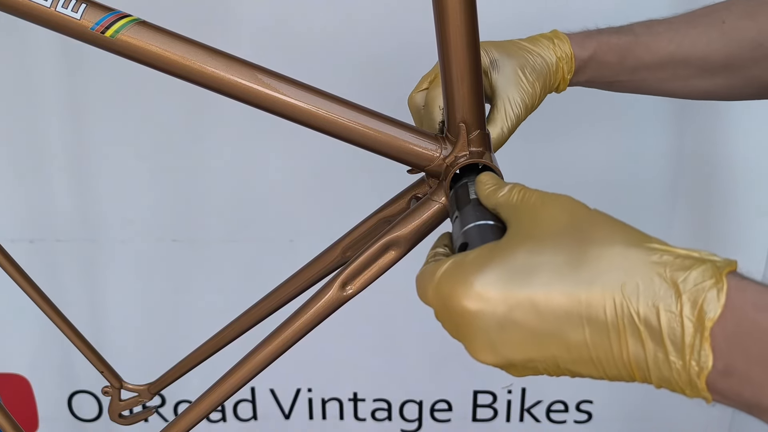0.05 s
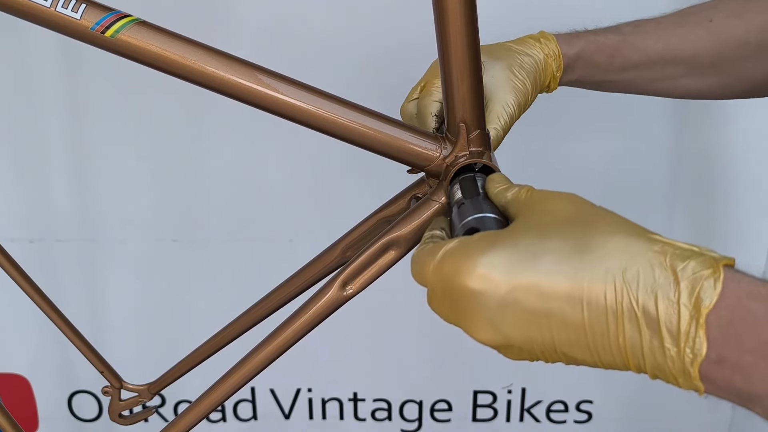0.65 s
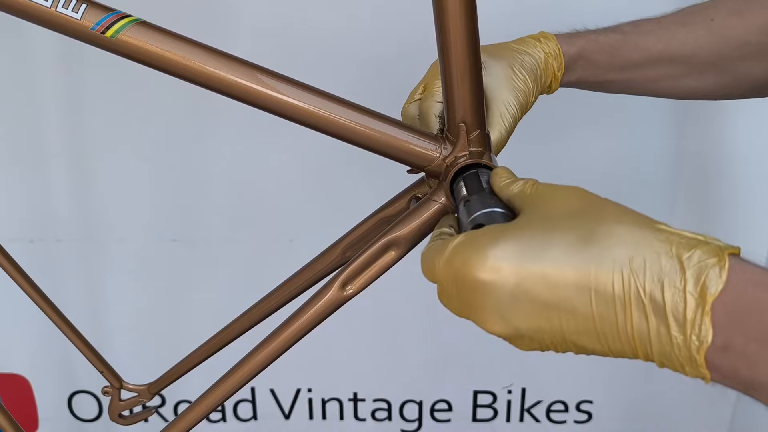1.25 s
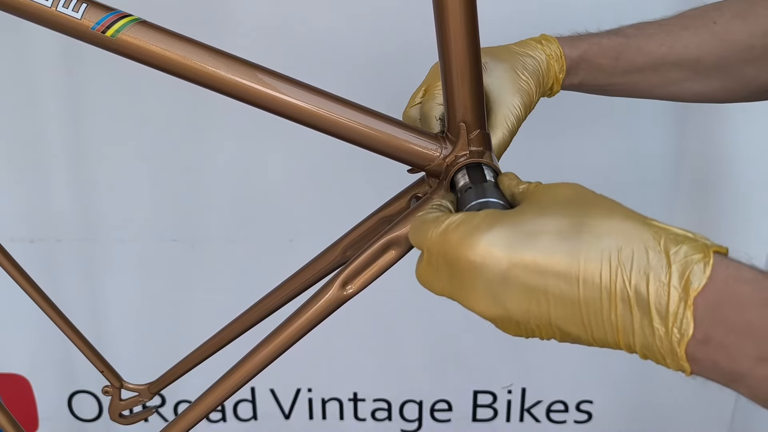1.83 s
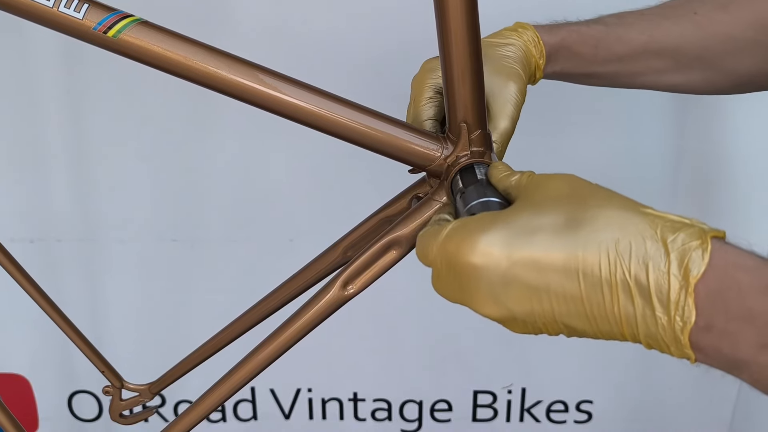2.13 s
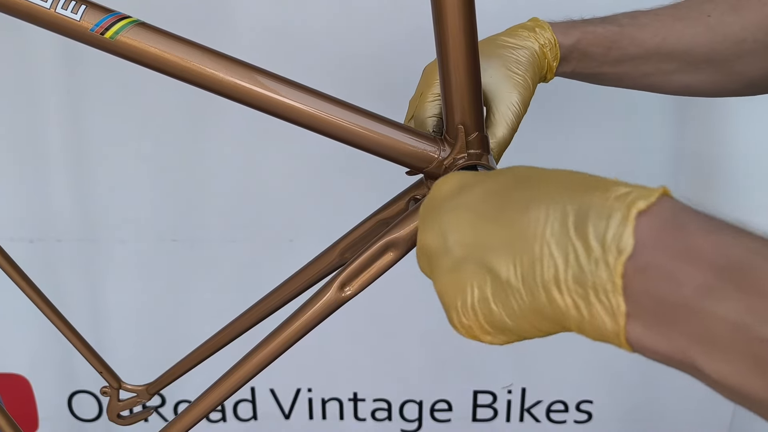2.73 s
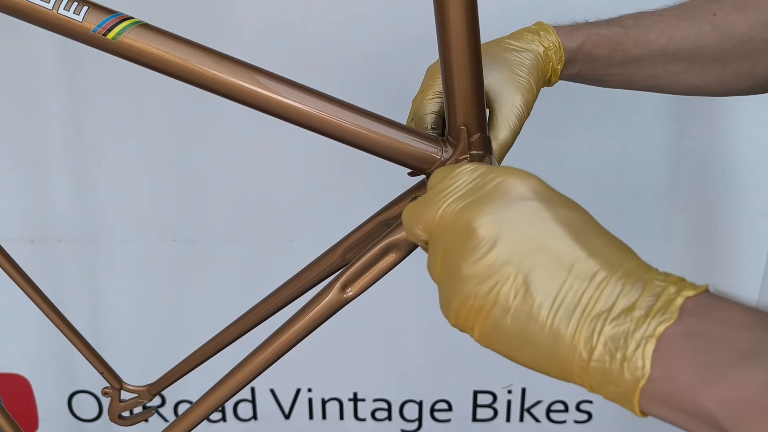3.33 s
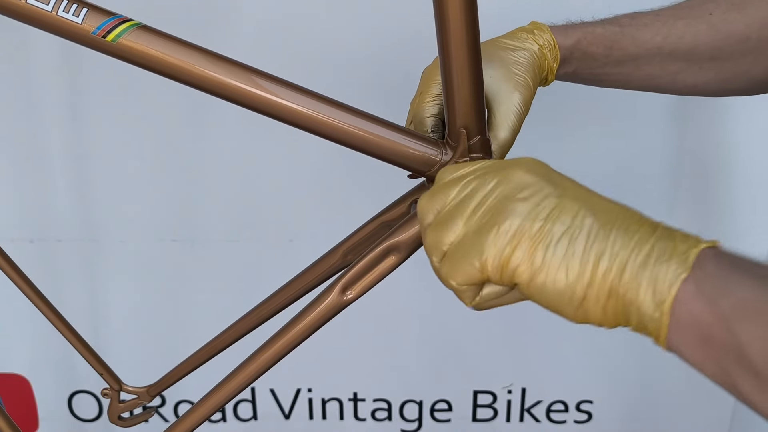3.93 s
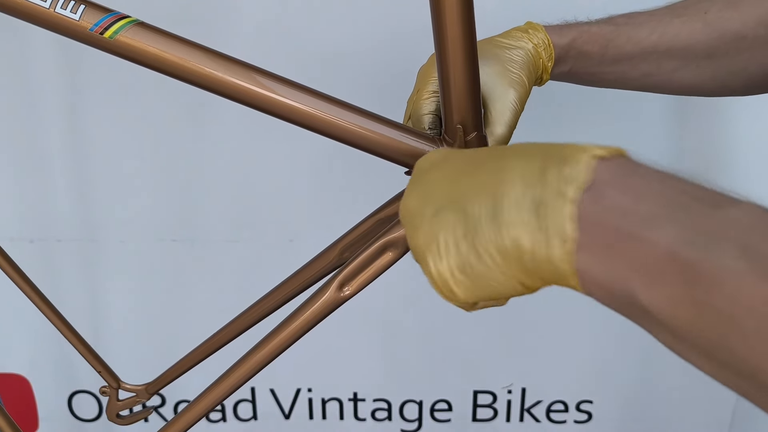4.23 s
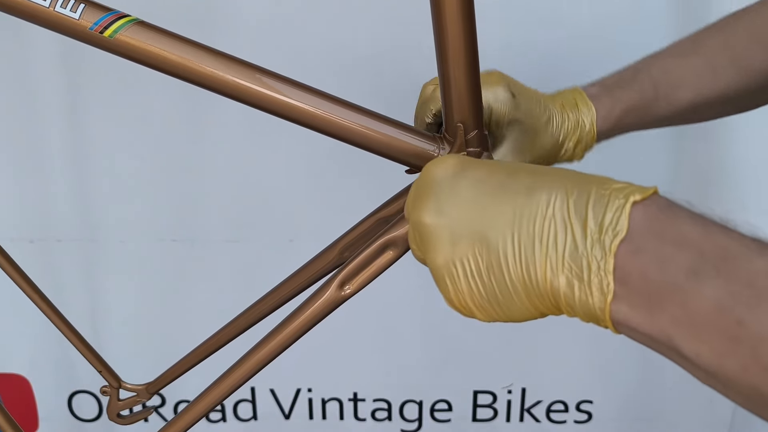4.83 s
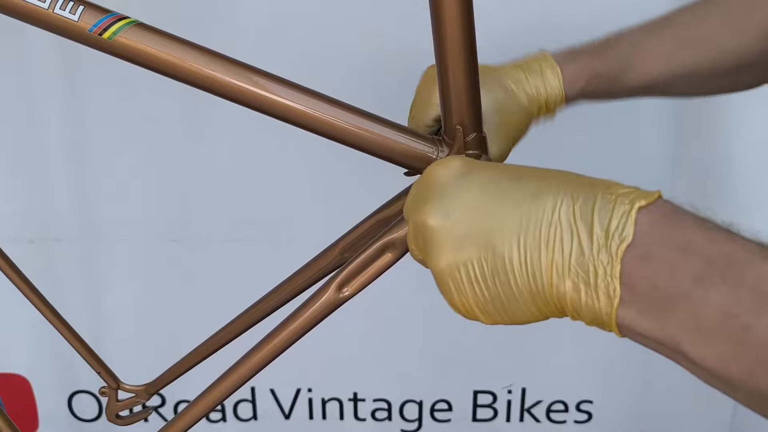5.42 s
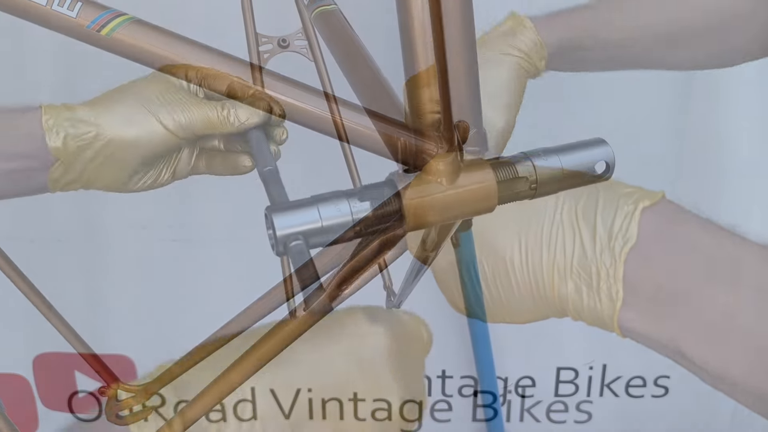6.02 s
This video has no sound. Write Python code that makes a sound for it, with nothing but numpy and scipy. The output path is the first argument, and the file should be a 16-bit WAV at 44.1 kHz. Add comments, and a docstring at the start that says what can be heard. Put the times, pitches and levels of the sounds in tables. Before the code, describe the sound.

A short rub of rubber gloves and a scrape lead into one ringing knock as a metal tool seats in a steel bicycle frame. Lighter clinks and faint scrapes follow while it is turned by hand. Later the gloves rub, crinkle and give tiny snaps, with a few more metal clicks among them. A spaced pair of microphones hears it from a little way back in a quiet workshop.

```python
"""A short rub of gloves, then a scrape into a ringing knock: a metal tool seats in the bottom bracket
of a steel bicycle frame and is turned by hand. Each knock sets the frame tubes ringing; in between,
the tool slides on the metal and the rubber gloves rub, crinkle and snap.
A spaced pair of microphones hears it in a quiet workshop, far enough back to take in plenty of room."""
import sys
import numpy as np
from scipy import signal
from scipy.fft import rfft, irfft, next_fast_len
from scipy.io import wavfile

SR = 44100
rng = np.random.default_rng(int(sys.argv[2]) if len(sys.argv) > 2 else 0)


def generate_wav(sig):
    """Save sig (samples, or channels by samples) to the path in sys.argv[1] as 16-bit PCM at SR."""
    pcm = np.round(np.clip(np.atleast_2d(sig).T, -1, 1) * 32767).astype(np.int16)
    wavfile.write(sys.argv[1], SR, pcm)


N = 272097
TIME = np.arange(N) / SR
AGE = np.arange(SR) / SR   # one second, counted from an onset
BLOW_GAIN = np.sqrt(SR / 100)   # gives a unit-energy blow the energy of 10 ms at unit power


# Modes of the frame's thump, the hollow bracket shell, the tool's clank and the long-ringing tubes.
# Each row: pitch in Hz, relative level in dB, time to fall 60 dB in seconds.
THUMP_MODES = [(121, -15, 0.081), (181, 1.5, 0.027), (243, -2.5, 0.06), (329.4, 0.5, 0.078),
               (382, -6, 0.093), (470, 2, 0.053)]
SHELL_MODES = [(773, 6, 0.026), (828, -3, 0.044), (876, -1, 0.11), (982, 1, 0.046)]
CLANK_MODES = [(1050, 2, 0.015), (1316, -3.5, 0.014), (1343, -2, 0.017), (1462, 0, 0.021),
               (1756, -6, 0.021), (2065, -5.5, 0.026)]
TUBE_MODES = [(242, -18, .35), (386, -12, .33), (490, -14, .65), (583, -17, .7), (803, -7, .25),
              (863, -6, .33), (942, -5, .33), (1104, -6, .44), (1246, -4, .25), (1372, -3, .3),
              (1512, -3, .32), (1658, -17, .4), (1696, -10, .22), (1762, -6, .25), (1948, -5, .28),
              (2094, -8, .3), (2342, -12, .2), (2401, -6, .28), (2470, -10, .25), (2988, -16, .3),
              (3499, -18, .28), (3671, -22, .27), (3895, -16, .22), (4840, -29, .26)]
# Tool meets frame. Each row: start in seconds, then relative dB of thump, shell, clank and clack.
KNOCKS = [(0.4015, -34, -25.5, -20.5, -34.5), (0.421, -58, -42, -40, -42), (0.4534, -54, -35.5, -51, -63),
          (0.463, -64, -42, -50, -59), (0.5772, -49, -42.5, -44.5, -72), (1.069, -62.5, -61, -61.5, -68),
          (1.212, -72, -59, -75, -72), (1.281, -66, -56.5, -66, -73), (1.610, -54.5, -46.5, -49.5, -59.5),
          (2.0232, -58, -46, -48, -53.5), (2.032, -58, -47.5, -69, -70), (2.517, -64, -81, -81, -69.5),
          (3.165, -74, -68, -67, -75), (3.387, -63, -73, -84, -75), (4.015, -59.5, -66, -67, -61.5),
          (4.470, -57, -66, -63, -68), (4.528, -45.5, -48.5, -47, -60), (4.758, -60, -52.5, -51, -41),
          (4.772, -65, -58.5, -51, -50.5)]

def knocks(room, tubes_db=-4, left_db=-0.3):
    """Each contact thumps the frame, sounds its shell and clanks the tool; the tubes ring on."""
    thump = struck(THUMP_MODES, lag_ms=0.12, spread_ms=0.044, contact_s=0.0024)
    shell = struck(SHELL_MODES, lag_ms=0.31, spread_ms=0.12, contact_s=0.00012)
    clank = struck(CLANK_MODES, lag_ms=0.25, spread_ms=0.0315, contact_s=0.0016)
    tubes = struck(TUBE_MODES, lag_ms=0.15, spread_ms=0.13, contact_s=0.0027)
    parts = np.array([with_room(thump, room, wet_db=-0.5),
                      with_room(shell, room, wet_db=-7),
                      with_room(clank, room, wet_db=-3.5) + from_db(tubes_db) * tubes,
                      with_room(clack(), room, wet_db=3)])
    out = np.zeros((2, N))
    for start, *levels_db in KNOCKS:
        add(out, start, BLOW_GAIN * np.tensordot(from_db(levels_db), parts, 1))
    return out * from_db([[left_db], [-left_db]])


def struck(modes, lag_ms, spread_ms, contact_s):
    """Modes swell on contact and ring, each from its own place, mostly nearer the left microphone."""
    out = 0
    for hz, db, t60 in modes:
        lag_s = (lag_ms + spread_ms * rng.standard_normal()) / 1000
        delays = np.maximum([[-lag_s], [lag_s]], 0)
        age = np.maximum(AGE - delays, 0)
        swell = 1 - np.exp(-(age / contact_s) ** 2)
        tone = np.sin(2 * np.pi * (hz * age + rng.random()))
        out = out + from_db(db) * swell * tone * decay(age, t60)
    return unit_energy(out)


# The spectrum of a hard contact. Each row: frequency in Hz, relative density in dB.
CLACK_COLOUR = [(400, -23), (1000, -11.5), (1600, 4), (2450, 4), (3000, -2), (3700, -4.5), (4800, -10),
                (6500, -19), (9000, -24), (11000, -37), (15500, -30.5)]

def clack(t60=0.019, contact_s=0.00078):
    """High modes too crowded to tell apart die within a few hundredths of a second."""
    hiss = coloured(diffuse_noise(N), CLACK_COLOUR)[:, :SR]
    attack = 1 - np.exp(-AGE / contact_s)
    return unit_energy(hiss * attack * decay(AGE, t60))


# Spectra of sliding metal, rubbing gloves and crinkling rubber.
# Each row: frequency in Hz, relative density in dB.
SCRAPE_COLOUR = [(60, -47.5), (130, -5), (240, 1), (450, 3), (620, 2), (830, -3.5), (1150, -4.5),
                 (1500, -8.5), (2400, -9.5), (3400, -16.5), (4550, -21), (7000, -34), (15000, -61.5)]
RUB_COLOUR = [(60, -29), (130, -5), (240, 2), (330, 1), (450, 5), (650, -5), (880, -1.5), (1300, -7.5),
              (2400, -9), (3200, -19.5), (4700, -19.5), (7000, -37), (15000, -77)]
CRINKLE_COLOUR = [(500, -11.5), (1600, 12), (2500, 7.5), (3400, 7.5), (4800, 5), (6000, 2), (7600, 1),
                  (8400, -4.5), (9200, -1.5), (10200, -12), (13000, -10), (15500, -10)]

def handling(room, rub_db=-1, crackle_db=-4, scrape_db=2.5):
    """The tool scrapes in the shell while the gloves rub and crinkle on it."""
    rubbing, flexing = hand_effort()
    sliding, pushing = scrape_effort()
    creasing = flexing + pushing
    rub = friction(rubbing, RUB_COLOUR, room, slips_per_s=4500, uneven_db=2, wet_db=-4.5)
    crinkle = friction(creasing, CRINKLE_COLOUR, room, slips_per_s=9500, uneven_db=2.7, wet_db=-2.5)
    crackle = friction(creasing, CRINKLE_COLOUR, room, slips_per_s=260, uneven_db=-0.9, wet_db=0.5)
    scrape = friction(sliding, SCRAPE_COLOUR, room, slips_per_s=6000, uneven_db=3.05, wet_db=1.5)
    rubber = from_db(rub_db) * rub + crinkle + from_db(crackle_db) * crackle
    return from_db(scrape_db) * scrape + tool_singing(sliding, room) + rubber


def friction(level, colour, room, slips_per_s, uneven_db, wet_db, direct_db=-7):
    """Tiny uneven slips come at random; their direct sound reaches the right microphone first."""
    sizes = from_db(uneven_db * np.minimum(rng.exponential(1, N), 4))
    slips = unit_power((rng.random(N) < slips_per_s / SR) * sizes)
    direct = slips * rng.standard_normal(N)
    direct = np.array([np.roll(direct, 18), direct])   # 0.4 ms later on the left
    grains = unit_power(slips * diffuse_noise(N) + from_db(direct_db) * direct)
    dry = coloured(grains * level, colour)
    return (dry + from_db(wet_db) * reverb(dry, room)) / np.hypot(1, from_db(wet_db))


# Metal slides on metal. Each row: start and end in seconds, then relative dB of the scrape
# at its start, the scrape at its end and the glove crinkle at its end.
SCRAPES = [(0.335, 0.406, -59.5, -39, -56), (0.52, 0.569, -67, -51.5, -72), (0.572, 0.689, -53.5, -67, -91),
           (1.204, 1.421, -68, -68, -100), (1.486, 1.609, -68, -48.5, -66.5), (1.594, 1.686, -64, -75, -82),
           (1.97, 2.019, -65, -53, -73), (4.455, 4.537, -59.5, -54.5, -64), (4.519, 4.606, -65.5, -61, -59),
           (4.695, 4.769, -65, -47.5, -62)]

def scrape_effort(catch_s=0.008):
    """Gains of scrape and pushing glove: a slide catches, then grows, holds or fades until it stops."""
    scrape, glove = np.zeros((2, N))
    for start, end, start_db, end_db, glove_db in SCRAPES:
        catch = np.clip((TIME - start) / catch_s, 0, 1) * (TIME < end)
        slide = catch * from_db(np.interp(TIME, [start, end], [start_db, end_db]))
        scrape += slide
        glove += slide * from_db(glove_db - end_db)
    return scrape, glove


# The tool's high modes. Each row: pitch in Hz, time to fall 60 dB in seconds, relative level in dB.
SINGING_MODES = [(4530, .014, -19), (5520, 0.037, -26)]

def tool_singing(sliding, room, loose_from_s=1.0, loose_until_s=1.9, drive_limit_db=-51, wet_db=-2):
    """While the tool slides loose in the shell, friction keeps its high modes ringing faintly."""
    modes = sum(from_db(db) * resonate(diffuse_noise(N), hz, t60) for hz, t60, db in SINGING_MODES)
    loose = (TIME > loose_from_s) & (TIME < loose_until_s)
    dry = np.minimum(sliding, from_db(drive_limit_db)) * loose * modes
    return dry + from_db(wet_db) * reverb(dry, room)


# The gloves keep shifting their grip. Each row: time in seconds, then relative dB of rub and crinkle.
GRIP = [(0.15, -72.5, -91), (0.8, -69.5, -100), (1.2, -64, -84), (2.25, -76.5, -97), (2.72, -70.5, -83.5),
        (3.3, -79.5, -89), (3.65, -70.5, -79.5), (5.3, -72.5, -84), (6.17, -74, -84)]
# The hands push or twist the tool.
# Each row: peak time, rise and fall in seconds, then relative dB of rub and crinkle.
STROKES = [(0.068, 0.086, 0.17, -59, -86), (1.048, 0.064, 0.083, -61, -79), (1.385, .06, 0.065, -70, -84),
           (1.853, .016, 0.068, -64, -76), (2.532, 0.043, 0.13, -56.5, -78), (3.047, .03, 0.11, -56.5, -69),
           (3.392, 0.067, 0.05, -64, -72.5), (3.65, 0.088, .08, -66, -80), (3.758, .07, 0.059, -72, -74.5),
           (4.018, 0.11, 0.087, -58, -74.5), (4.147, 0.049, 0.069, -53.5, -63.5),
           (4.298, 0.037, 0.07, -70, -75.5), (4.977, 0.044, .06, -59.5, -66),
           (5.016, 0.035, .08, -58.5, -64), (5.075, 0.089, 0.057, -62, -66), (5.48, 0.2, 0.17, -61, -68),
           (5.665, 0.17, .11, -82, -74), (5.842, 0.051, 0.08, -58.5, -67.5),
           (5.925, 0.1, 0.087, -55.5, -60.5), (6.05, .05, .16, -79, -74.5)]

def hand_effort(fidget_db=2, fidgets_per_s=13, stroke_range_db=20.5, roundness=1.17):
    """Gains of rubbing and crinkling: a restless grip, and strokes that swell to a peak and relax."""
    times, *grip_db = np.transpose(GRIP)
    held_db = np.array([np.interp(TIME, times, db) for db in grip_db])
    fidget = np.interp(TIME * fidgets_per_s, np.arange(1000), rng.standard_normal(1000))
    power = from_db(held_db + fidget_db * fidget) ** 2
    for peak, rise, fall, *levels_db in STROKES:
        near = (TIME > peak - 2 * rise) & (TIME < peak + 2 * fall)
        from_peak = np.maximum((peak - TIME[near]) / rise, (TIME[near] - peak) / fall)
        swell = from_db(-stroke_range_db * from_peak ** roundness)   # 1 is pointed, 2 is round
        power[:, near] += np.outer(from_db(levels_db), swell) ** 2
    return np.sqrt(power)


# Rubber lets go of metal. Each row: start in seconds, relative level in dB, pitch in Hz,
# left microphone over right in dB, room over direct sound in dB, decay constant in seconds.
SNAPS = [(2.569, -69, 6300, -10, -12, 0.00073), (3.043, -67, 6000, 2, -15, 0.0046),
         (3.391, -71.5, 7000, 1, -4, .003), (4.026, -83.5, 9000, 7, 0, .002),
         (4.145, -71, 5970, 10, -13, 0.0037), (4.474, -70.5, 6940, -9, -3, 0.0017),
         (5.008, -68, 7300, 6, -12, 0.0081), (5.889, -69.5, 7160, 8.5, 0, .006)]

def glove_snaps(room, skin_q=1.4, crack_db=-17):
    """Stretched rubber snaps free in a bright tick."""
    out = np.zeros((2, N))
    for start, db, hz, pan_db, wet_db, decay_s in SNAPS:
        burst = rng.standard_normal((2, SR)) * (np.exp(-AGE / decay_s) + 1e-12)
        skin = signal.iirpeak(hz, skin_q, fs=SR)
        ring = signal.lfilter(*skin, signal.lfilter(*skin, burst))
        tick = unit_energy(ring + from_db(crack_db) * burst)
        mic_gains = from_db(db + np.array([[pan_db], [-pan_db]]) / 2)
        add(out, start, BLOW_GAIN * mic_gains * with_room(tick, room, wet_db))
    return out


# Tiny squeaks of the gloves. Each row: peak time in seconds, pitch in Hz, level in dB.
SQUEAKS = [(0.072, 6140, -75), (0.153, 6260, -82)]

def glove_squeaks(width_s=0.01, t60=0.013):
    """Rubber sticks and squeaks for an instant."""
    out = np.zeros((2, N))
    for peak, hz, db in SQUEAKS:
        swell = np.exp(-((TIME - peak) / width_s) ** 2 / 2)
        out += from_db(db) * swell * resonate(rng.standard_normal((2, N)), hz, t60)
    return out


# The workshop's reverberation. Each row: frequency in Hz, time to fall 60 dB in seconds.
ROOM_T60 = [(100, 0.25), (250, 0.39), (600, 0.41), (1200, 0.31), (4000, 0.34), (8000, 0.24), (15000, 0.11)]

def workshop(gap_s=0.0009, build_s=0.0023):
    """The room's response: reflections thicken after a gap, then each band dies at its own rate."""
    edges_hz = np.geomspace(50, 18000, num=22)
    onset = 1 - np.exp(-np.maximum(AGE - gap_s, 0) / build_s)
    out = 0
    for low, high in zip(edges_hz, edges_hz[1:]):
        bandpass = signal.butter(2, [low, high], "band", fs=SR, output="sos")
        band = signal.sosfilt(bandpass, diffuse_noise(SR))
        dying = decay(AGE, at_hz(ROOM_T60, np.sqrt(low * high)))
        out = out + np.sqrt(high - low) * unit_energy(band * onset * dying)
    return unit_energy(out)


# The hush of the workshop. Each row: frequency in Hz, relative density in dB.
HUSH_COLOUR = [(15, -76), (25, -31.5), (70, -20.5), (105, -11.5), (236, -7), (293, -4.5), (384, -11),
               (516, -6.5), (575, -4), (624, -10.5), (1160, -10.5), (1560, -16.5), (1940, -11), (4250, -26),
               (16000, -62)]
# Its low resonances. Each row: pitch in Hz, time to fall 60 dB in seconds, level in dB.
ROOM_MODES = [(132.9, 0.96, -83), (239.5, 0.3, -77.5), (397.2, 0.28, -76.5), (459, .2, -77)]

def room_tone(hush_db=-69.5):
    """A steady hush surrounds the microphones and stirs the low resonances of the room."""
    stirring = diffuse_noise(N)
    hush = from_db(hush_db) * coloured(diffuse_noise(N), HUSH_COLOUR)
    return hush + sum(from_db(db) * resonate(stirring, hz, t60) for hz, t60, db in ROOM_MODES)


# How alike the spaced pair hears the room. Each row: frequency in Hz, left-right correlation.
MIC_LIKENESS = [(50, -0.18), (150, 1), (300, 0.91), (550, 0.52), (1000, -0.29), (2000, -0.0064),
                (15000, 0.37)]

def diffuse_noise(size):
    """White noise from all around, most alike at the two microphones in the upper bass."""
    padded = next_fast_len(size)
    mid, side = rfft(rng.standard_normal((2, padded)))
    alike = at_hz(MIC_LIKENESS, np.arange(len(mid)) * SR / padded)
    pair = np.sqrt((1 + alike) / 2) * mid + np.sqrt((1 - alike) / 2) * side * [[1], [-1]]
    return irfft(pair, padded)[:, :size]


def reverb(x, room):
    """What the room returns of a sound."""
    return signal.fftconvolve(np.atleast_2d(x), room, axes=-1)[:, :x.shape[-1]]


def with_room(blow, room, wet_db):
    """A blow followed by its reverberation."""
    return blow + from_db(wet_db) * unit_energy(reverb(blow, room))


def resonate(noise, hz, t60):
    """Noise through one resonance, at unit power."""
    radius = decay(1 / SR, t60)
    feedback = [1, -2 * radius * np.cos(2 * np.pi * hz / SR), radius ** 2]
    return unit_power(signal.lfilter([1, 0, -1], feedback, noise))


def coloured(x, spectrum):
    """Give a flat signal a spectrum, keeping its power."""
    size = next_fast_len(N)
    hz = np.arange(size // 2 + 1) * SR / size
    gain = unit_power(from_db(at_hz(spectrum, hz)))
    return irfft(rfft(x, size) * gain, size)[..., :N]


def decay(age, t60):
    """A gain that falls 60 dB every t60 seconds."""
    return np.exp(-np.log(1000) * age / t60)


def from_db(db):
    """Decibels to gain."""
    return 10 ** (np.asarray(db) / 20)


def unit_power(x):
    """Scale to unit power."""
    return x / np.sqrt(np.mean(x ** 2) + 1e-20)


def unit_energy(x):
    """Scale each channel to unit energy."""
    return x / np.sqrt(np.sum(x ** 2, axis=-1, keepdims=True) + 1e-20)


def at_hz(points, hz):
    """Read a table on a log-frequency axis."""
    table_hz, values = np.transpose(points)
    return np.interp(np.log(np.maximum(hz, 1)), np.log(table_hz), values)


def add(out, start_s, sound):
    """Mix a sound in from start_s on."""
    i = int(start_s * SR)
    out[..., i:i + sound.shape[-1]] += sound[..., :N - i]


def scene(dip_at_s=4.4635, dip_length_s=0.011, dip_edge_s=0.0025, dip_db=-24):
    """Tool, frame and gloves share one workshop; the level dips once, briefly."""
    room = workshop()
    mix = knocks(room) + handling(room) + glove_snaps(room) + glove_squeaks() + room_tone()
    dip = np.clip((dip_length_s / 2 - np.abs(TIME - dip_at_s)) / dip_edge_s, 0, 1)
    return mix * from_db(dip_db * dip)


def record(dry, low_cut_hz=75, high_cut_hz=15900):
    """The microphones drop the deep bass, and the highest treble is cut steeply."""
    low_cut = signal.butter(2, low_cut_hz, "high", fs=SR, output="sos")
    high_cut = signal.ellip(10, 0.1, 70, high_cut_hz, fs=SR, output="sos")
    return signal.sosfilt(high_cut, signal.sosfilt(low_cut, dry))


dry = scene()
out = record(dry)
generate_wav(out)
```